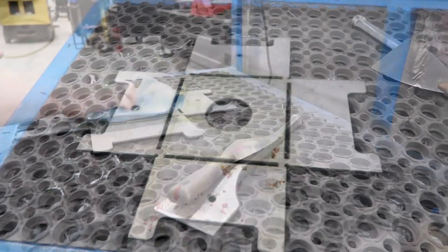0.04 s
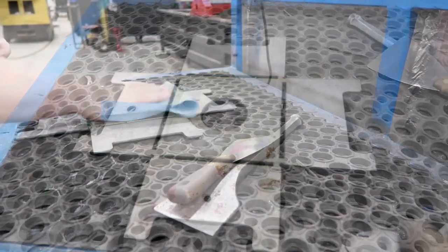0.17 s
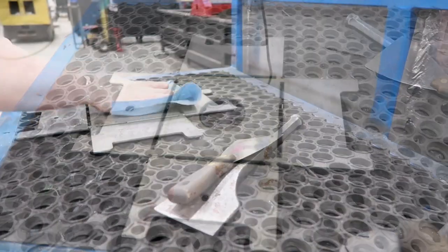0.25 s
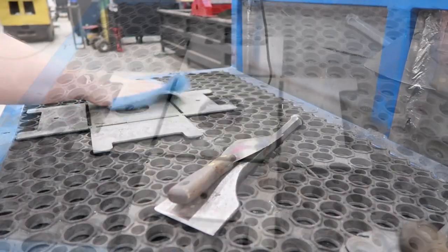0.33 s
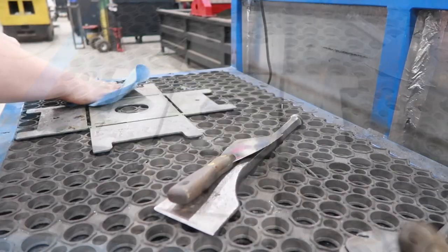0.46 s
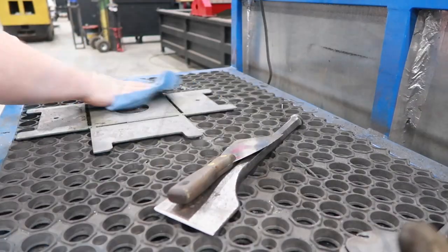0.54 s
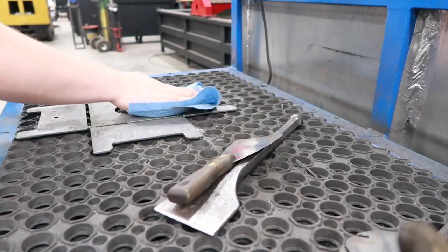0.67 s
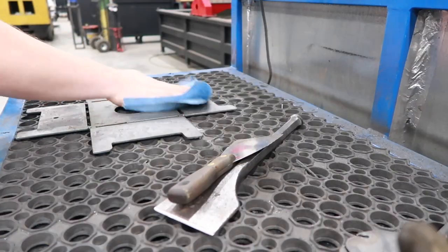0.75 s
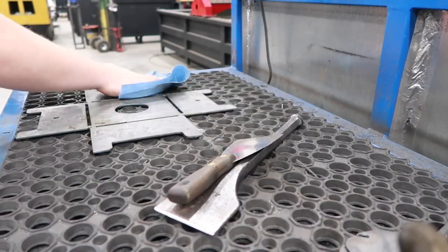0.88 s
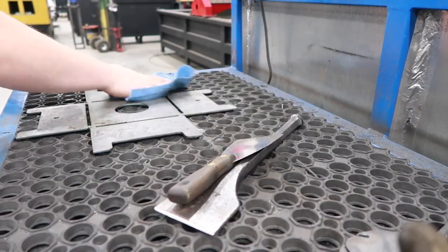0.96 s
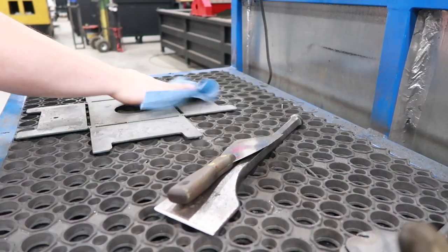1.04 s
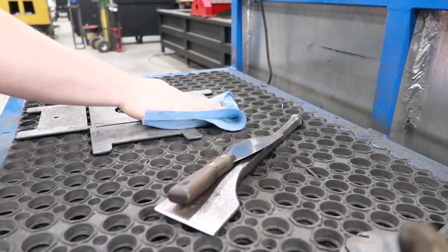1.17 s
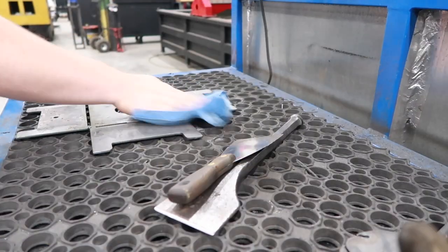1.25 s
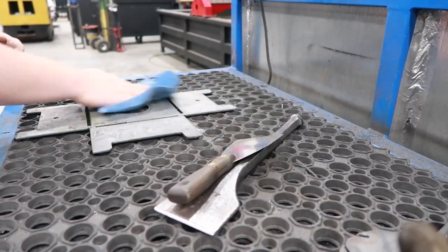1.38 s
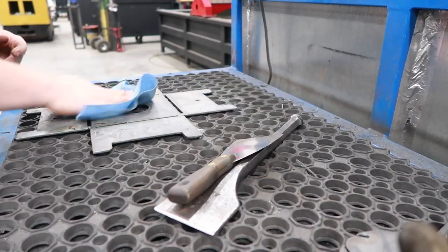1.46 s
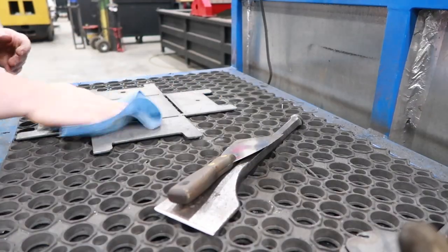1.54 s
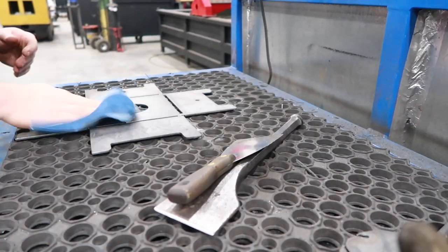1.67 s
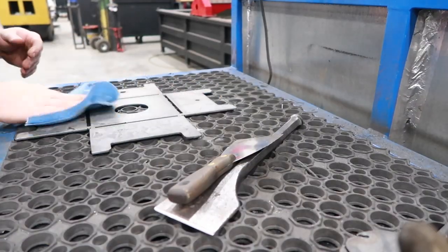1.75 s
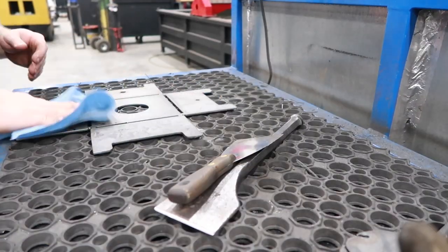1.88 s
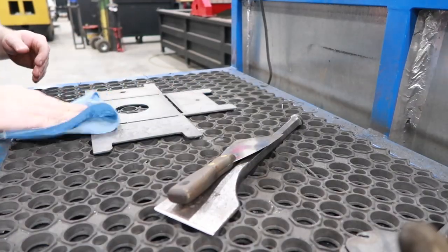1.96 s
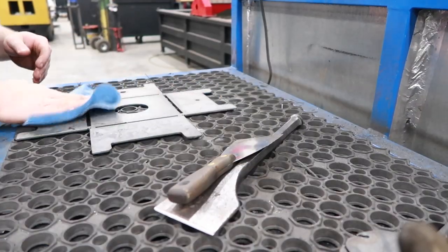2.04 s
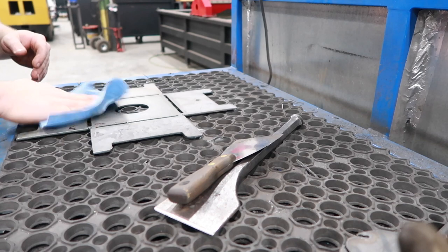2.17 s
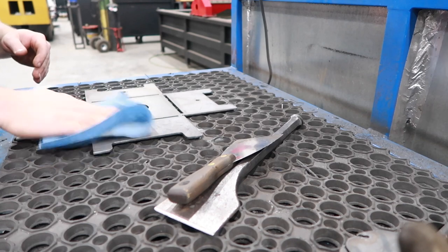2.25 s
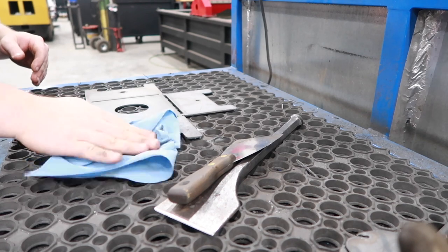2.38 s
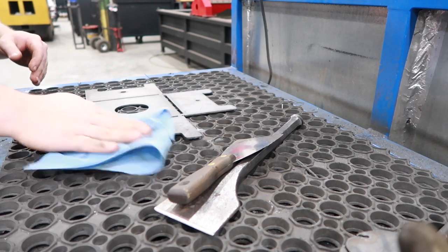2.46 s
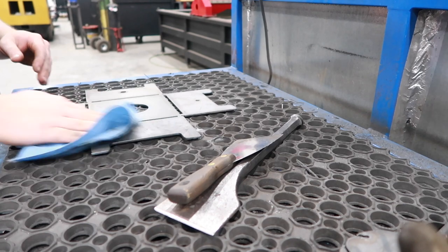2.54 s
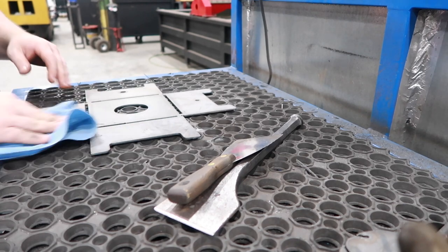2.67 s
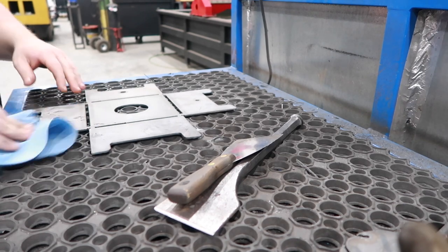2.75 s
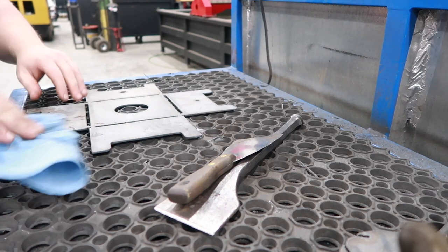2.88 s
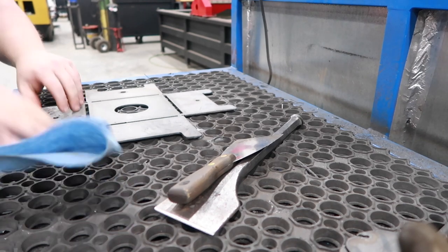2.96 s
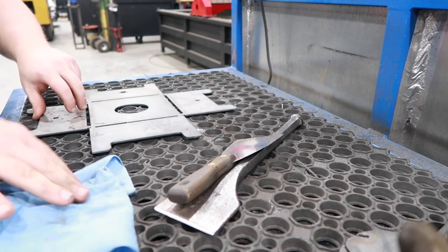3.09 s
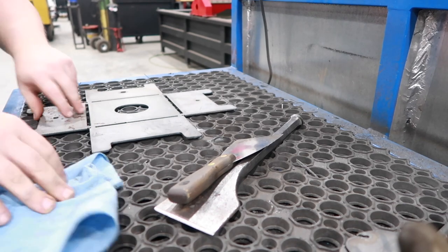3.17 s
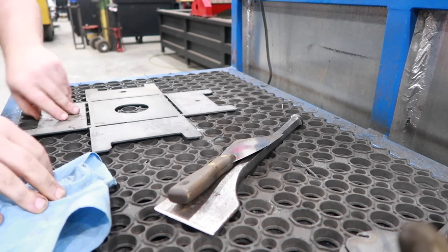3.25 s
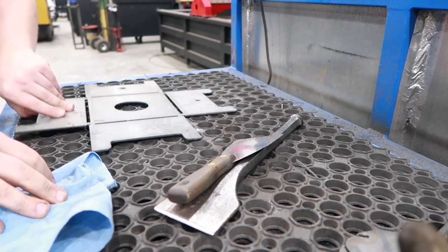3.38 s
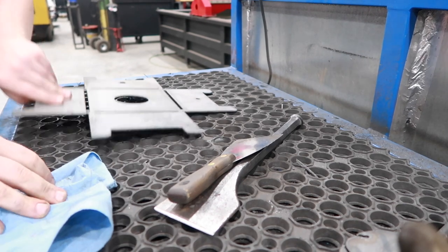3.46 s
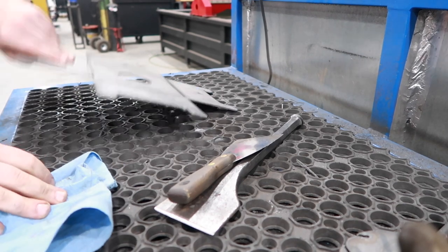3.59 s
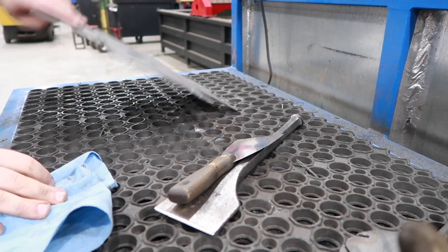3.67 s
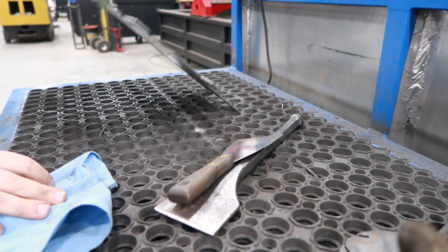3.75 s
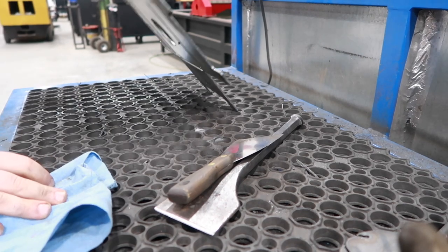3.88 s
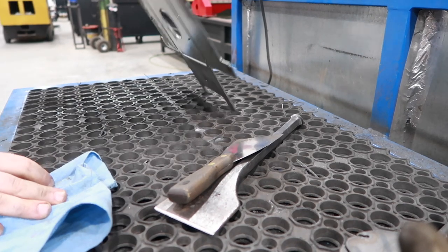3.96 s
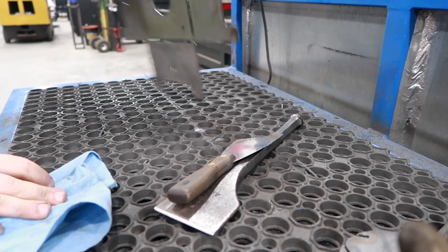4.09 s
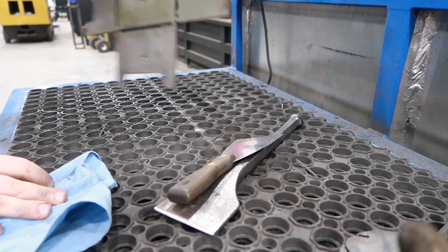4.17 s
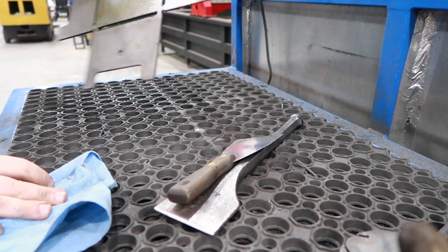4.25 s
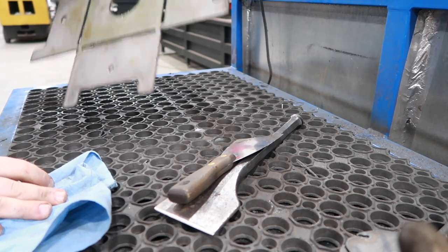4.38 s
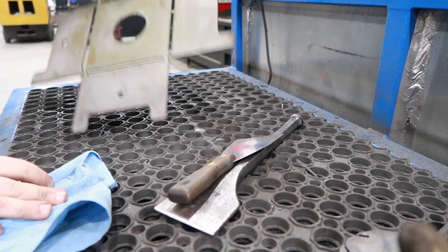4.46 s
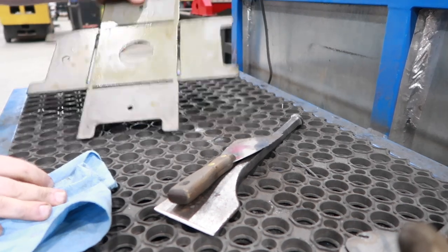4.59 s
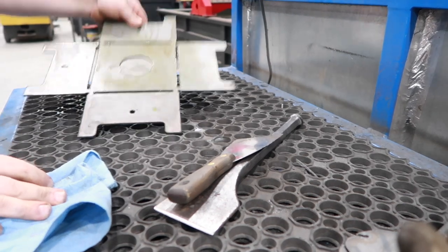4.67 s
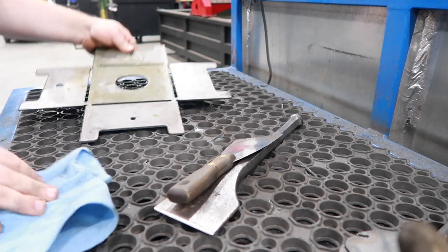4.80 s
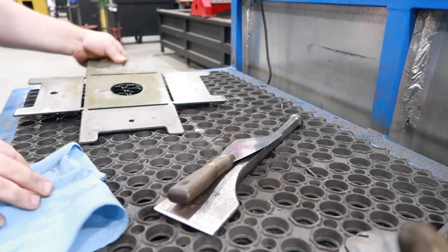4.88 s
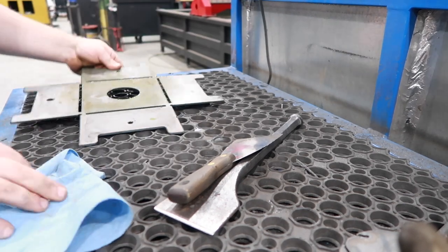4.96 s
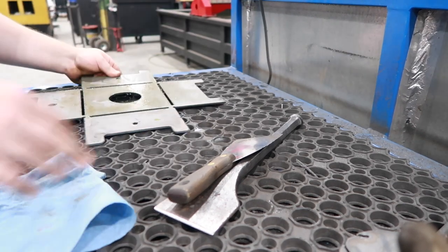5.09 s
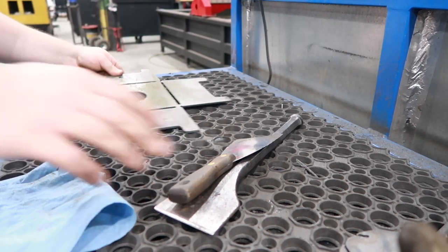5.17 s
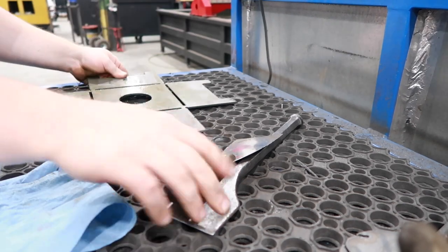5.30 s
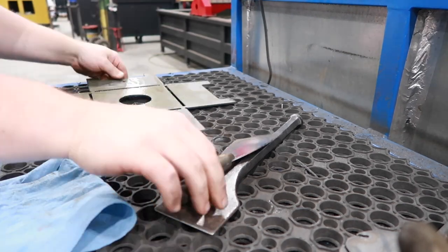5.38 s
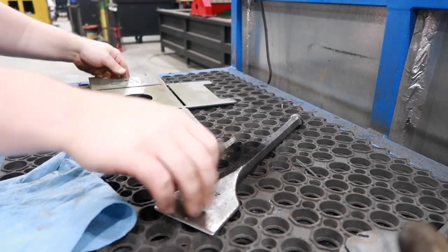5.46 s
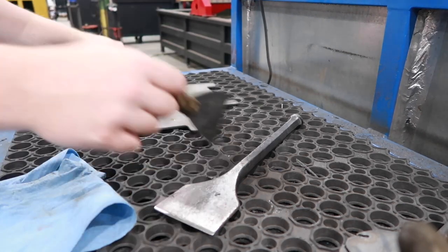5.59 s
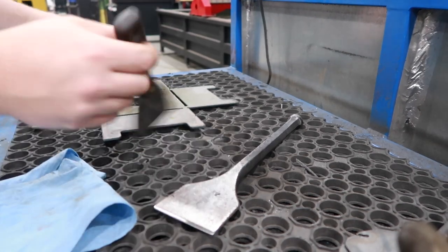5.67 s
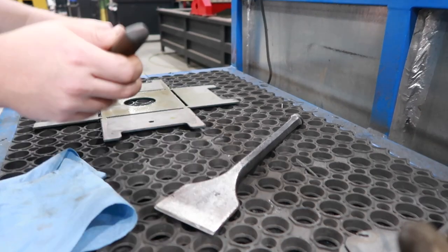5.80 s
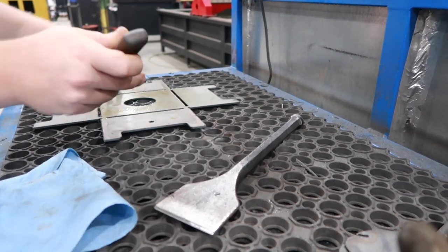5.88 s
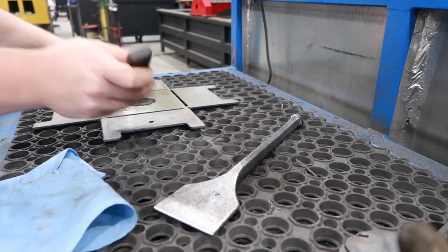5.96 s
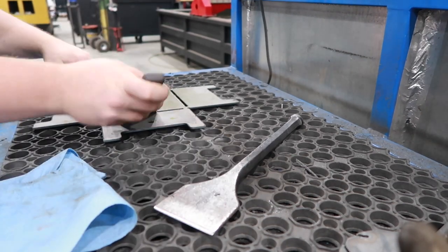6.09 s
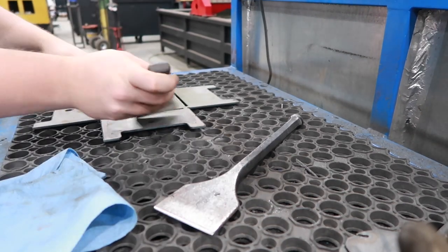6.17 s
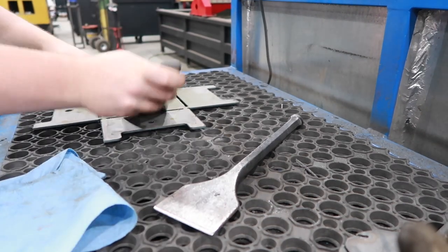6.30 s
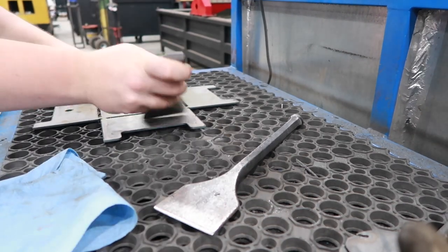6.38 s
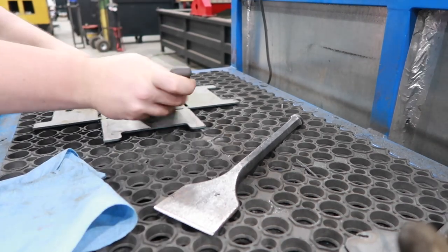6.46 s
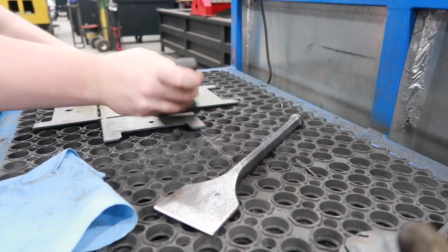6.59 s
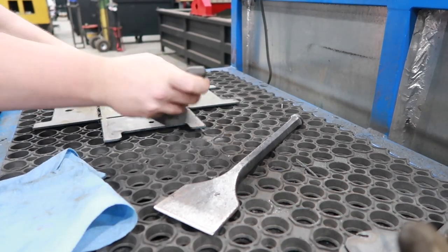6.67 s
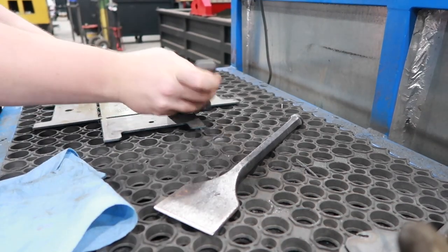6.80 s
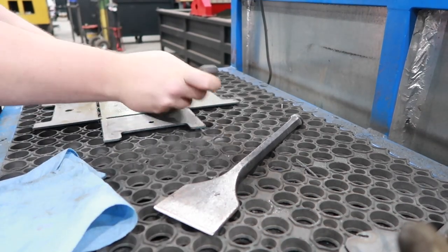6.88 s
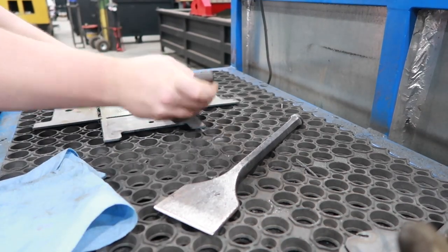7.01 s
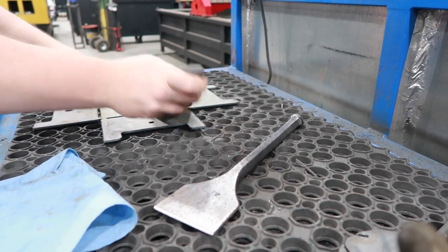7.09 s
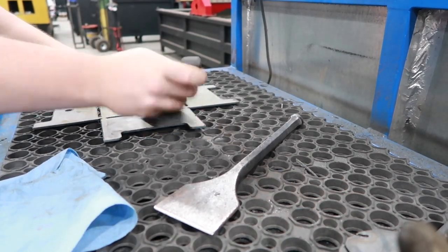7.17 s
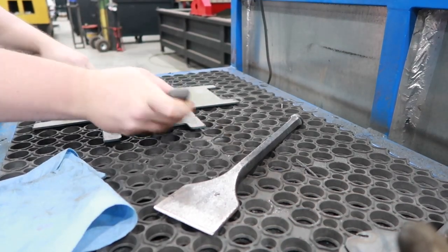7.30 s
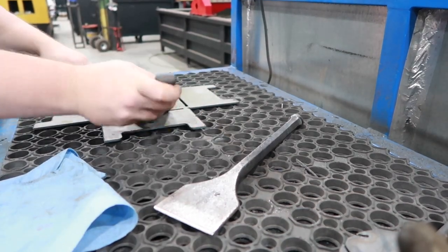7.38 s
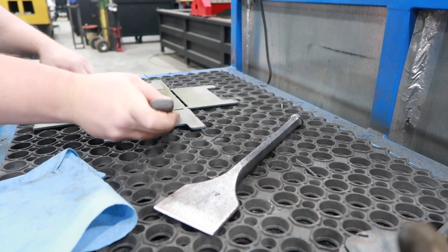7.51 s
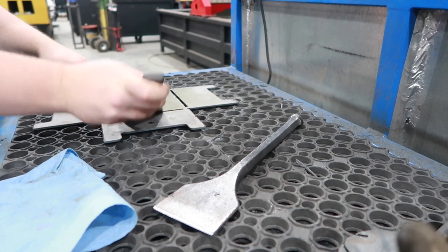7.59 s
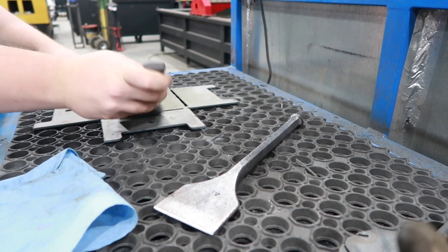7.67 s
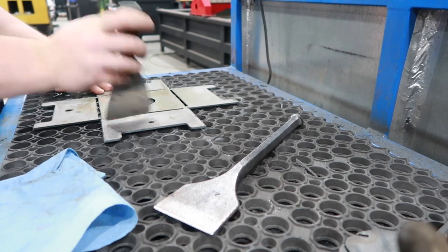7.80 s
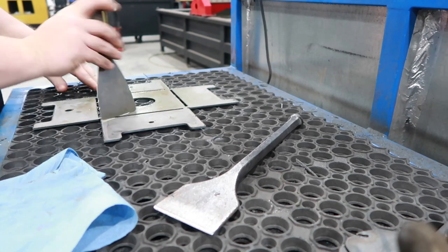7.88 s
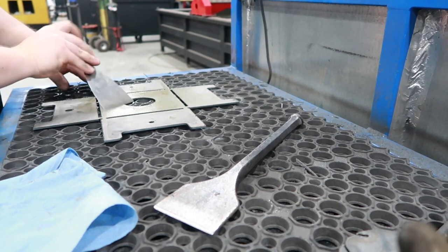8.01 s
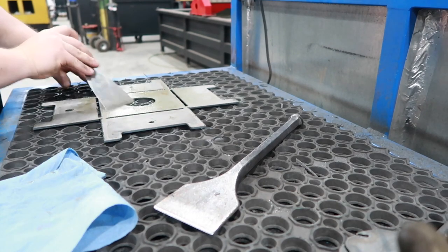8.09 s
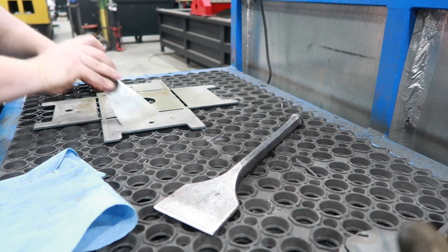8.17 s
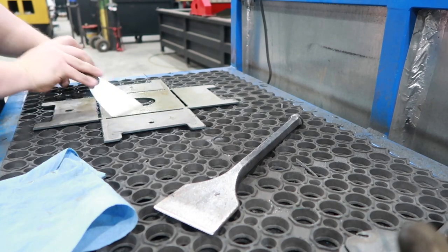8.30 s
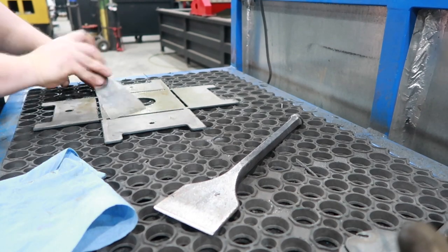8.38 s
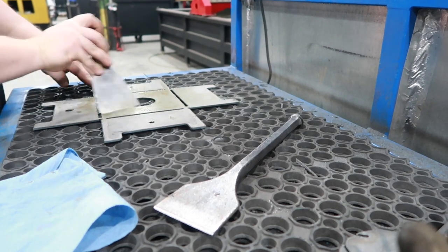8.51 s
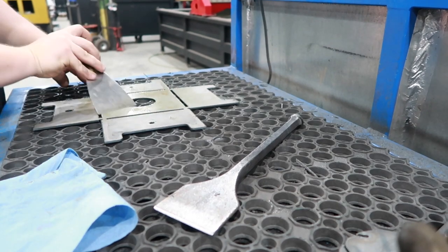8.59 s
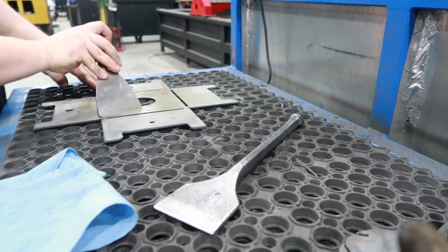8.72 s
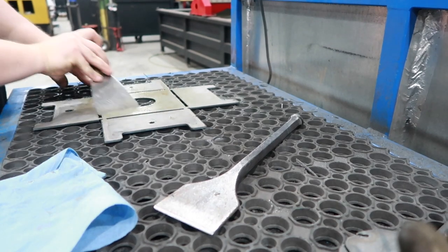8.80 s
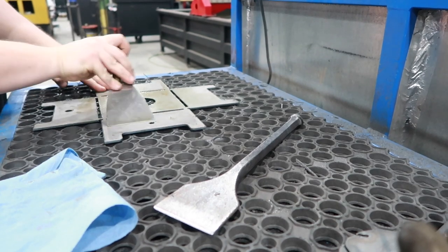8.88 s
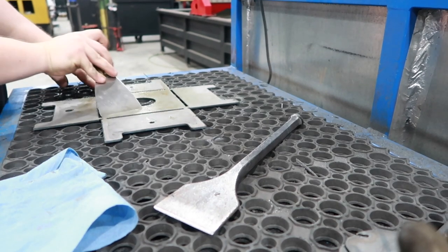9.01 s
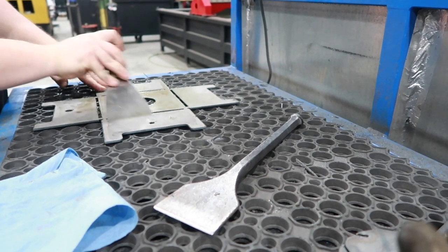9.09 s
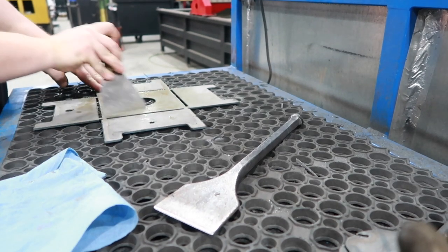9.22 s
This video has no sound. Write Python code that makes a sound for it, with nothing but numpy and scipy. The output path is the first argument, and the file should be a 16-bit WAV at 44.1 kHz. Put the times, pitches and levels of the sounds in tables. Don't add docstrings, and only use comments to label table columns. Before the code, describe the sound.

Close stereo in a workshop hall with low ventilation noise and faint hum. A cloth wipes a steel plate in quick fibrous strokes, with small clicks and pings. The plate is lifted and set down quietly. A heavy chisel thumps and rattles on the bench, then a scraper rasps loudly back and forth, catching on rough slag and ringing the damped steel.

```python
import sys
import numpy as np
from scipy import signal
from scipy.fft import rfft, irfft
from scipy.io import wavfile
from scipy.ndimage import uniform_filter1d

SR = 44100
rng = np.random.default_rng(int(sys.argv[2]) if len(sys.argv) > 2 else 0)


def file_out(sig):
    cols = np.atleast_2d(sig).T
    lim = np.clip(cols, -1, 1)
    pcm = np.round(lim * 32767).astype(np.int16)
    wavfile.write(sys.argv[1], SR, pcm)


def volts(x):
    e = np.asarray(x, float) / 20
    return 10 ** e


N = 407925
TIME_S = np.arange(N) / SR

# f/Hz, side against mid/dB
HALL_WIDTH = [(60, -49), (120, -18), (240, -8), (480, -5.5), (950, -1), (1890, -3), (3770, -4.5),
              (7520, 0.5), (15000, 25)]


def rms_one(x):
    return x / np.sqrt(np.mean(x ** 2) + 1e-20)


def butter(x, order, hz, kind="low"):
    return signal.sosfilt(signal.butter(order, hz, kind, fs=SR, output="sos"), x)


def drift(rate):
    r = np.exp(-80 * np.pi * rate / SR)
    slow = signal.lfilter([1], [1, -2 * r, r * r], rng.standard_normal(N // 40 + 2002))[2000:]
    return np.interp(np.arange(N) / 40, np.arange(len(slow)), rms_one(slow))


def colour(x, points, smear_s=0):
    hz = np.maximum(np.fft.rfftfreq(4096, 1 / SR), 1)
    curve_hz, curve_db = np.array(points)[:, 0], np.array(points)[:, 1]
    log_gain = np.interp(np.log(hz), np.log(curve_hz), curve_db) * np.log(10) / 20
    cepstrum = irfft(log_gain)
    cepstrum[1:2048] *= 2
    cepstrum[2049:] = 0
    response = irfft(np.exp(rfft(cepstrum)))
    if smear_s:
        burst = rng.standard_normal(2048) * np.exp(-np.arange(2048) / (smear_s * SR))
        response = np.convolve(response, burst / np.linalg.norm(burst))
    return signal.oaconvolve(x, response)[:N]


def unit_colour(x, points):
    return colour(x, points) / np.std(colour(rng.standard_normal(N), points))


def grains(per_s, scatter_db):
    sizes = volts(scatter_db * np.minimum(rng.exponential(1, N), 5)) * rng.choice([-1, 1], N)
    return rms_one(sizes * (rng.random(N) < per_s / SR))


def stroke_db(rows, speed_up_s_per_db, ease_s, shoulder_db, slack_db, stop_s):
    turn, turn_db, crest, top_db = np.transpose(rows)
    after = np.append(turn[1:], turn[-1] + .17)
    after_db = np.append(turn_db[1:], -60)
    on = turn + np.clip(speed_up_s_per_db * (top_db - turn_db - 4), .003, .65 * (crest - turn))
    off = np.clip(crest + ease_s, crest, np.maximum(after - stop_s, crest + .004))
    still = np.minimum(off + stop_s, after - .001)
    shoulder = top_db - shoulder_db
    s = np.transpose([turn, on, crest, off, still]).ravel()
    db = np.transpose([turn_db - slack_db, shoulder, top_db, shoulder, after_db - slack_db]).ravel()
    return np.interp(TIME_S, np.maximum.accumulate(s), db, left=-90, right=-90)


def ring(clicks, hz, t60):
    r = volts(-60 / (max(t60, .003) * SR))
    w = 2 * np.pi * hz / SR
    return signal.lfilter([0, np.sin(w)], [1, -2 * r * np.cos(w), r * r], clicks + 1e-18)


def pings(rows, rise_s):
    out, t = np.zeros(N + SR), np.arange(SR // 2) / SR
    for s, db, hz, t60_ms in rows:
        at = round(s * SR)
        beats_db = 2.5 * np.interp(t, t[::600], rng.standard_normal(len(t[::600])))
        level = volts(db - 4.5 + beats_db - 67000.0 * t / t60_ms)
        out[at:at + len(t)] += level * np.sin(2 * np.pi * hz * t) * (1 - np.exp(-t / rise_s))
    return out[:N]


def plate(drive, wander_db, rate, sharpen, span):
    # f/Hz, width/Hz, level/dB
    plate_modes = [(1664, 25, -6.5), (2120, 27, -2.5), (2430, 27, -3), (2700, 58, -4), (3040, 45, -2),
                   (3110, 35, -3), (4742, 45, -9), (3537, 30, -7), (3770, 30, -8), (4020, 59, -1),
                   (4258, 30, -7), (4870, 47, -6), (5410, 120, -13), (2250, 40, -5), (5880, 48, -12),
                   (2570, 35, -4), (6620, 56, -11.5), (3270, 40, -7)]
    out = np.zeros(N)
    for hz, width_hz, level_db in plate_modes:
        t60 = sharpen * 1.89 / width_hz
        noise_gain = np.sqrt(4 * np.log(1000) / (t60 * SR))
        favour = volts(level_db + wander_db * drift(rate)[span])
        out[span] += noise_gain * ring(drive[span] * favour, hz, t60)
    return out / np.linalg.norm(volts(np.array(plate_modes)[:, 2]))


def sheet(drive, spectrum, t60, rate, count):
    t, out = np.arange(3072) / SR, 0
    where = drift(rate) * count / 2
    for k in range(count):
        hz = np.geomspace(250, 15500, 220)[:, None] * (1 + .006 * rng.standard_normal((220, 1)))
        lasts = t60 * volts(rng.normal(0, 2.7, (220, 1)))
        sines = np.sin(2 * np.pi * (hz * t + rng.random((220, 1))))
        modes = np.sqrt(hz / lasts) * volts(-60 * t / lasts) * sines
        response = colour(np.sum(modes, axis=0), spectrum)
        share = np.sqrt(2 / count) * np.cos(np.pi * (where - k) / count)
        out = out + signal.oaconvolve(drive * share, response / np.linalg.norm(response))[:N]
    return out


def hall():
    # f/Hz, level/dB per Hz
    air_curve = [(12, -28), (20, -4), (64, -10), (101, -7), (232, -10.5), (290, -13.5), (343, -11),
                 (838, -26), (2350, -29.5), (3770, -29.5), (4100, -34.5), (8700, -42.5), (10900, -48),
                 (15600, -96)]
    # f/Hz, level/dB
    hum_partials = [(58.2, -50), (145.3, -57), (231.5, -57.5), (344.5, -62.5)]
    # t/s, level/dB
    room_level = [(0, -51), (.6, -48), (5.85, -47), (6.2, -56), (6.45, -63), (7.83, -65), (8.78, -57),
                  (9.25, -64)]
    gain = volts(np.interp(TIME_S, *np.transpose(room_level)) + 47)
    air = colour(rng.standard_normal(N), air_curve)
    side = colour(colour(rng.standard_normal(N), air_curve), HALL_WIDTH)
    scale = volts(-46.5 + 1.2 * drift(1.9)) / np.std(air)
    hum = 0
    for hz, db in hum_partials:
        phase = 2 * np.pi * np.cumsum(hz * (1 + 0.0062 * drift(3.13))) / SR
        hum = hum + np.sqrt(2) * volts(db + 2.3 * drift(9)) * np.sin(phase)
    return gain * (scale * air + hum), gain * scale * side


def cloth():
    # turn t/s, level at the turn/dB, crest t/s, crest level/dB
    wipe_strokes = [(.005, -58, .18, -49), (.29, -34, .42, -28.5), (.517, -42, .626, -25),
                    (.74, -44.5, .851, -26.5), (.969, -43, 1.089, -26), (1.251, -41.5, 1.39, -27.5),
                    (1.473, -35, 1.568, -27.5), (1.655, -39.5, 1.733, -27.5), (1.845, -38.5, 1.961, -33),
                    (2.016, -47, 2.052, -30.5), (2.176, -47, 2.261, -29), (2.466, -44.5, 2.55, -37),
                    (2.575, -34, 2.61, -32), (2.74, -40, 2.86, -41)]
    # centre t/s, level/dB, half length/s
    rustle_swells = [(.255, -43, .035), (.14, -60, .08), (2.62, -41, .05), (2.82, -42, .1),
                     (2.72, -46, .05), (2.95, -56, .08), (3.2, -59, .08), (3.5, -62, .2), (4.15, -57, .3),
                     (4.82, -57, .06), (5.24, -46, .08), (5.04, -56, .1), (5.64, -54, .06)]
    # f/Hz, level/dB per Hz
    fibre_curve = [(180, -32), (300, -8.5), (397, -6), (697, -7.5), (1730, 1.5), (2580, 2.5), (5510, -14),
                   (6500, -16.5), (9840, -27.5), (11200, -55), (13200, -22), (15600, -30)]
    coarse_s = np.arange(0, N, 16) / SR
    swells = sum(volts(db - 10 * ((coarse_s - s) / half_s) ** 2) for s, db, half_s in rustle_swells)
    rustle = np.repeat(swells, 16)[:N]
    wipe_db = stroke_db(wipe_strokes, .0035, ease_s=1, shoulder_db=6.5, slack_db=3.5, stop_s=0.048)
    wipes = volts(wipe_db + 1.17 * drift(30))
    rustle = rustle * volts(2.5 * drift(5.6))
    fibres = grains(per_s=14000., scatter_db=2.0)
    hiss = unit_colour(fibres * (wipes + volts(-5) * rustle), fibre_curve)
    slide = butter(fibres * rustle, 2, [2400, 4600], "band")
    stir = fibres * (volts(-24) * wipes + volts(-15) * rustle)
    ringing = plate(stir, wander_db=6.5, rate=3.3, sharpen=4.4, span=slice(0, 6 * SR))
    return volts(-0.84) * hiss + volts(7) * slide + ringing


def handling():
    # t/s, peak level/dB, centre f/Hz, t60/ms
    click_events = [(.2149, -23, 4180, 60), (1.0898, -2, 2500, 10), (2.583, -27, 4000, 40),
                    (2.5989, -18, 3300, 30), (3.0969, -33, 1600, 26), (3.185, -41, 2000, 130),
                    (3.2415, -34, 2300, 10), (3.3125, -40, 4500, 40), (3.4191, -36, 3500, 140),
                    (3.957, -30, 2400, 8.7), (4.204, -40, 5030, 60), (4.313, -40.5, 6000, 70),
                    (4.4513, -44, 3000, 20), (4.5472, -37, 3000, 55), (4.5704, -33, 2500, 70),
                    (4.778, -44, 3500, 200), (4.925, -23, 2500, 70), (4.926, -37, 11000, 80),
                    (2.668, -30, 4000, 40), (4.03, -42, 4000, 70), (4.115, -43, 5500, 60),
                    (3.81, -44, 3500, 90), (5.742, -22, 1700, 45), (5.785, -34, 1700, 45),
                    (5.038, -36, 2210, 70), (5.189, -42, 3600, 250), (5.235, -36, 3640, 300),
                    (5.4001, -31, 4400, 30), (5.4268, -28.5, 3800, 27), (5.5817, -32, 2820, 19),
                    (5.6436, -29, 3300, 200), (5.672, -9, 1500, 40), (5.722, -23, 4300, 90),
                    (5.722, -33, 7000, 120), (6.0153, -35, 4000, 23)]
    # t/s, peak level/dB, f/Hz
    hand_pings = [(.2149, -25, 4020), (.2149, -29, 4730), (.225, -31, 4260), (2.578, -22, 4260),
                  (2.6, -30, 5250), (2.6, -30, 5880), (2.585, -33, 6620), (2.76, -39, 3530),
                  (2.84, -40, 3560), (2.596, -22, 3500), (2.668, -25, 4260), (2.38, -32, 4760),
                  (2.4, -32, 3270), (2.4, -33, 3570), (2.6, -30, 2560), (2.6, -32, 4800), (2.74, -40, 3500),
                  (2.74, -41, 3270), (4.03, -48, 4880), (4.03, -51, 3950), (4.0, -50, 4258),
                  (4.12, -49, 5600), (4.21, -50, 6600), (4.2, -50, 3050), (4.32, -52, 6600),
                  (4.55, -50, 2400), (4.6, -55, 4000), (5.04, -54, 4880), (2.82, -38, 4740),
                  (3.4191, -33, 4258), (3.43, -50, 5270), (3.42, -46, 2121), (3.42, -46, 3050),
                  (3.81, -48, 3520), (4.0312, -47, 3570), (4.116, -51, 6000), (4.12, -46, 3570),
                  (4.2038, -45, 4260), (4.3136, -40, 4880), (4.32, -49, 3700), (4.8, -50, 3260),
                  (5.23, -45, 3470)]
    # t/s, peak level/dB, f/Hz, t60/ms
    bench_knocks = [(.2149, -28, 7350, 60), (.2149, -28, 4400, 60), (5.672, -20, 3580, 150),
                    (4.926, -29, 2126, 100), (4.926, -31, 1211, 120), (4.926, -36, 3058, 200),
                    (6.318, -30, 265, 60), (6.318, -30, 480, 60), (6.536, -31, 265, 60),
                    (5.2, -46, 3600, 200), (5.24, -45, 4020, 300), (5.27, -46, 3560, 200),
                    (4.555, -30.5, 78, 550), (4.565, -33, 302, 150), (5.6436, -28, 3030, 350),
                    (5.675, -7, 322, 90), (5.68, -22, 74.4, 270), (5.69, -34, 608, 830),
                    (7.72, -42, 1196, 1200), (2.575, -28, 1050, 90), (2.855, -36, 1380, 100),
                    (5.68, -23, 900, 90), (5.675, -16, 1400, 80)]
    out, t = np.zeros(N + SR), np.arange(SR // 8) / SR
    noises = rng.standard_normal((len(click_events), SR // 8))
    for (s, db, hz, t60_ms), noise in zip(click_events, noises):
        band = signal.butter(2, [hz / 2.3, min(hz * 1.6, 18000)], "band", fs=SR)
        crack = signal.lfilter(*band, noise * volts(-6e4 * t / t60_ms) * (1 - np.exp(-t / .0006)))
        crack = butter(crack, 3, min(1000 + 2.2 * hz, 16000))
        at = round(s * SR)
        out[at:at + len(t)] += volts(db) * crack / np.max(np.abs(crack))
    clicks = out[:N]
    rings = [(*row, 240 if row[0] < 2.75 else 560) for row in hand_pings]
    shimmer = sheet(clicks, [(800, -3), (4000, 0.5), (9000, -6)], t60=0.08, rate=4.9, count=2)
    return clicks + volts(-9) * shimmer + pings(rings + bench_knocks, rise_s=.003)


def blow(s, db, fall_db):
    since = np.arange(0, N, 16) / SR - s
    slope = np.where(since < 0, -1800, fall_db)
    return np.repeat(volts(db - slope * since), 16)[:N]


def thumps():
    # t/s, boom level/dB, boom fall/(dB/s), rattle level/dB, rattle fall/(dB/s)
    thump_events = [
        (4.56, -31, 110, -43, 300),
        (4.926, -36.5, 340, -42, 320),
        (5.645, -62, 200, -39, 60),
        (5.68, -22, 90, -16, 260),
        (5.722, -45, 200, -23, 250),
        (5.745, -40, 200, -25, 160),
        (6.03, -42, 600, -55, 600),
    ]
    # f/Hz, level/dB per Hz
    boom_curve = [(25, -23), (60, 3), (130, -1), (310, -4.5), (500, -7.5), (1000, -20.5), (2000, -48.5)]
    # f/Hz, level/dB per Hz
    rattle_curve = [(290, -41), (500, -10), (1300, -9.5), (2500, -0.5), (2740, -6), (8490, -30.5),
                    (10800, -77), (12000, -79), (15600, -113), (22000, -120)]
    # f/Hz, level/dB, t60/s
    chisel_modes = [(608, -10, 1.0), (1642, -10, 0.6), (1922, -3, 0.15), (1997, -12, 0.58), (2126, -6, 0.5),
                    (2239, -10, 0.49), (2406, -4, 0.32), (2568, -6, 0.49), (3036, -8, 0.3),
                    (3725, -10, 0.4), (4258, -22, 0.65), (4883, -20, 0.33), (6320, -30, 0.33),
                    (6605, -23, 0.35)]
    booms = sum(blow(s, db, fall_db) for s, db, fall_db, _, _ in thump_events)
    rattles = sum(blow(s, db, fall_db) for s, _, _, db, fall_db in thump_events)
    boom = rms_one(colour(grains(per_s=1400.0, scatter_db=2.0), boom_curve)) * booms
    jolts = grains(per_s=3500.0, scatter_db=5.5) * rattles
    strikes = volts(-8) * jolts[:7 * SR]
    for s, _, _, db, _ in thump_events:
        strikes[round(s * SR)] += volts(db + 28)
    free = sum(ring(strikes * volts(db), hz, t60) for hz, db, t60 in chisel_modes)
    free = np.pad(free, (0, N - 7 * SR))
    return boom + volts(-36) * free + volts(-9.5) * sheet(jolts, rattle_curve, t60=0.069, rate=10.0, count=2)


def scraper():
    # turn t/s, level at the turn/dB, crest t/s, crest level/dB
    rasp_strokes = [(6.034, -44, 6.064, -15), (6.07, -12, 6.115, -13), (6.262, -34, 6.311, -14),
                    (6.378, -36.5, 6.41, -22), (6.474, -35.5, 6.535, -17.5), (6.589, -34, 6.614, -23.5),
                    (6.675, -37, 6.738, -15.5), (6.79, -31, 6.818, -25), (6.863, -34.5, 6.91, -17.5),
                    (6.984, -27, 7.035, -23), (7.084, -28, 7.11, -21), (7.172, -32, 7.241, -23),
                    (7.295, -35, 7.38, -18.5), (7.442, -43, 7.486, -25), (7.556, -38, 7.6, -22),
                    (7.702, -39.5, 7.72, -35), (7.889, -53, 7.896, -33), (7.939, -41, 8.068, -27.5),
                    (8.118, -45, 8.205, -17), (8.272, -25, 8.34, -20), (8.398, -33, 8.432, -20),
                    (8.495, -43, 8.555, -22), (8.636, -41, 8.668, -13), (8.743, -40, 8.783, -24),
                    (8.846, -38, 8.9, -14.5), (8.966, -31.5, 9.045, -25), (9.083, -40, 9.135, -25),
                    (9.206, -43, 9.24, -27)]
    # t/s, peak level/dB, favoured mode f/Hz, ring share/dB
    snag_events = [(6.0457, 1, 4700, -27), (6.0536, 3, 2570, -20), (6.1044, -4, 4890, -16),
                   (6.2829, -2.5, 3770, -8), (6.2942, -.5, 3040, -9), (6.3185, 9, 3050, -38),
                   (6.3932, -8, 2080, -7), (6.492, -9, 3030, -12), (6.5357, 5, 3260, -31),
                   (6.6075, -4, 2700, -17), (6.7302, -4, 4020, -14.5), (6.909, -2, 3060, -10),
                   (6.9214, -2.5, 4257, -12), (7.1033, -10, 4020, -8), (7.3767, 1, 2740, -15),
                   (7.3897, 8, 3020, -30), (7.5625, -7, 3720, -13), (7.6086, 5, 3040, -37),
                   (7.7157, -17, 2500, -19), (7.891, -10, 2440, -15), (8.1716, -3, 3120, -14),
                   (8.1993, -13, 1700, -4), (8.4322, 0, 2820, -32), (8.522, -11, 4260, -6.5),
                   (8.6532, -1, 2120, -9), (8.688, 3, 1640, -30), (8.8888, 5, 1640, -19),
                   (9.1162, -5, 3110, -23), (9.1394, -9, 2540, -17), (6.5236, -9, 3100, -20),
                   (6.6945, -16, 3550, -15), (6.803, -24, 3030, -8), (6.8873, -11, 3150, -15),
                   (6.9991, -12, 3040, -12), (7.3333, -19, 2690, -12), (7.3443, -12, 2420, -15),
                   (7.3557, -7, 2700, -15), (7.4655, -15, 3580, -12), (7.9923, -22, 2260, -12),
                   (8.0477, -14, 3040, -15), (8.1589, -24, 2470, -15), (8.4114, -15, 3100, -15),
                   (8.5321, -9, 4250, -15), (8.7591, -15, 2420, -15), (8.8593, -15, 2750, -15),
                   (8.8783, -9, 3080, -15), (9.1003, -18, 2670, -15), (9.2179, -14, 3560, -15)]
    # f/Hz, level/dB per Hz
    rasp_curve = [(88, -73), (150, -43), (339, -30), (1090, -13), (1300, -15.5), (1670, -8.5), (3050, -3.5),
                  (4500, -14), (6780, -22.5), (8890, -27), (10800, -45), (12900, -35.5), (15600, -27)]
    # low band/dB, band of 1350 to 2100 Hz/dB, treble above 4 kHz/dB
    stroke_tones = [(5., 3., 3.), (3.5, 2.5, 6.5), (-2.5, 3., 2.5), (5., -1., -3.), (-1., -2., .2),
                    (5.5, -6., 1.5), (-4.5, -3., 3.), (3.5, -1.5, -1.5), (-3.5, -1., 2.5), (3., 1., 2.5),
                    (3., .1, .1), (6., 2.5, .1), (-3., -8., -2.5), (-.7, .1, -1.5), (-6., -6., -2.5),
                    (.1, -.7, .6), (3., -2., .5), (6., 1., -.5), (-5.5, 5., 2.), (.1, 2.5, 5.5),
                    (.7, .1, 2.), (3., 2.5, 4.), (.7, 4., 2.5), (7.5, 1.5, 3.), (-4., 4., 2.), (3., 1.5, 2.),
                    (-2., 4., .1), (5., 7.5, 3.)]
    # t/s, peak level/dB, f/Hz, t60/ms
    corner_rings = [(6.07, -18, 4880, 300), (6.12, -24, 6620, 150), (6.23, -26, 2770, 200),
                    (6.74, -20, 4020, 500), (6.74, -24, 3050, 500), (6.75, -26, 2410, 500),
                    (6.92, -24, 4020, 500), (6.92, -26, 5600, 400), (6.92, -28, 2770, 500),
                    (7.04, -22, 4800, 250), (7.1, -24, 4880, 500), (7.12, -25, 4258, 500),
                    (7.35, -16, 2750, 200), (7.47, -28, 3560, 300), (7.72, -32, 4880, 200),
                    (8.04, -26, 3100, 300), (8.04, -28, 4020, 300), (8.2, -22, 4020, 400),
                    (8.21, -23, 4258, 500), (8.33, -28, 4760, 300), (8.365, -26, 4258, 400),
                    (6.92, -21, 4258, 600), (8.0, -33, 720, 300), (7.99, -30, 2250, 250),
                    (7.892, -30, 3100, 250), (8.07, -30, 5600, 150), (8.9, -24, 2770, 350),
                    (8.9, -26, 4258, 600), (8.91, -24, 2200, 300), (8.53, -28, 5600, 250),
                    (8.53, -32, 7200, 200), (8.66, -24, 5880, 150), (8.9, -24, 1640, 500),
                    (8.43, -24, 4020, 250)]
    s, peak_db, hz, ring_db = np.transpose(snag_events)
    turn, _, crest, top_db = np.transpose(rasp_strokes)

    ease_s = .013 + .0022 * (-13 - top_db)
    effort_db = np.interp(TIME_S, crest, top_db - np.mean(top_db))
    rasp_db = stroke_db(rasp_strokes, .0017, ease_s, shoulder_db=8.5, slack_db=1.5, stop_s=0.021)
    gain = volts(rasp_db + 1.7 * drift(113))

    drive, short = np.zeros(N + SR), np.arange(SR // 8) / SR
    for at_s, db, noise in zip(s, peak_db, rng.standard_normal((len(snag_events), SR // 8))):
        at = round(at_s * SR)
        drive[at:at + len(short)] += volts(db - 10 - 60 * short / 0.018) * noise
    knocks = volts(-11) * butter(drive[:N], 3, [270, 1300], "band")
    drive = drive[:N] + grains(per_s=4000., scatter_db=2.6) * gain

    steel = volts(-1.7) * sheet(drive, rasp_curve, t60=0.061, rate=6.8, count=4)
    steel += volts(-8) * unit_colour(drive, rasp_curve)
    steel += volts(-7.2) * plate(drive, wander_db=4.0, rate=7.2, sharpen=2.6, span=slice(6 * SR, N))
    body = butter(steel, 2, [480, 1250], "band")
    treble = butter(steel, 2, 4000, "high")
    middle = butter(steel, 1, [1350, 2100], "band")
    stroke = np.clip(np.searchsorted(turn, TIME_S) - 1, 0, None)
    low_db, middle_db, treble_db = uniform_filter1d(np.transpose(stroke_tones)[:, stroke], size=400)
    steel += body * (volts(-1 - .1 * effort_db + low_db) - 1)
    steel += treble * (volts(-.28 * effort_db + treble_db) - 1) + middle * (volts(middle_db) - 1)
    steel = butter(steel, 4, 230, "high")

    snag_rings = zip(s, peak_db + ring_db, hz, np.full(len(s), 240.))
    rings = pings(snag_rings, rise_s=0.0017) + pings(corner_rings, rise_s=.01)
    return steel + volts(low_db) * knocks + rings


def walls(x, t60, level_db):
    t = np.arange(SR // 2) / SR
    tails = rng.standard_normal((2, len(t))) * volts(-60 * t / t60) * (t > .008)
    dull = butter(x, 1, 5000)
    return np.array([volts(level_db) * signal.oaconvolve(dull, tail / np.linalg.norm(tail))[:N] for tail in tails])


def scene():
    # f/Hz, side against mid/dB
    near_width = [(60, -28), (200, -15), (380, -16), (700, -22), (2400, -25), (4400, -5), (8100, 3),
                  (9600, 0.5), (10900, 15), (12600, 2), (15000, 5)]
    near = cloth() + handling() + thumps() + scraper()
    air_mid, air_side = hall()
    wet_mid, wet_side = walls(near, t60=0.35, level_db=-25)
    mid = near + wet_mid + air_mid
    turn = 1.5 * drift(3.0)
    side = colour(near * np.cos(turn), near_width, smear_s=0.011)
    side += colour(near * np.sin(turn), near_width, smear_s=0.0039)
    side += colour(wet_side, HALL_WIDTH) + air_side
    return np.array([mid + side, mid - side])


def top_cut(x):
    return signal.sosfilt(signal.butter(12, 15780, fs=SR, output="sos"), x)


def record(dry):
    cut = butter(dry, 2, 36, "high")
    cut = np.array([colour(channel, [(11000, 0), (13000, -2)]) for channel in cut])
    cut = signal.sosfilt(signal.cheby2(12, 70, 15800, fs=SR, output="sos"), cut)
    mix = np.clip(cut, -.95, .95)
    return top_cut(mix)


dry = scene()
out = record(dry)
file_out(out)
```